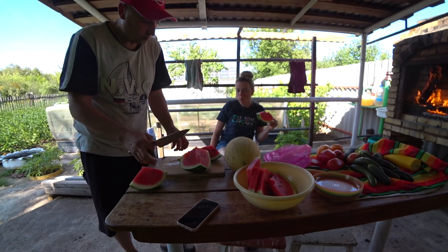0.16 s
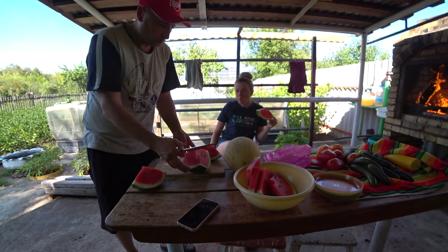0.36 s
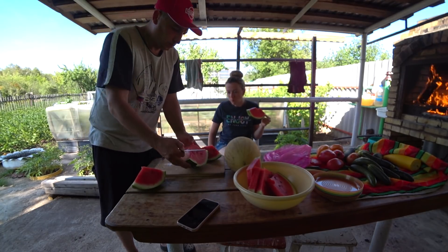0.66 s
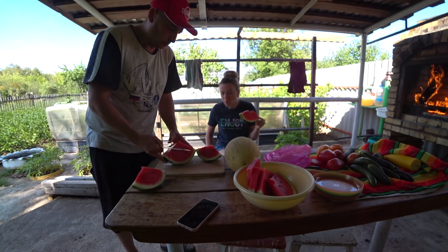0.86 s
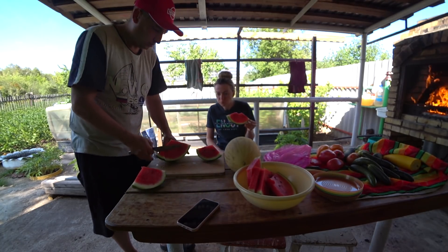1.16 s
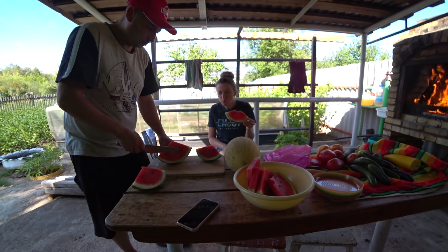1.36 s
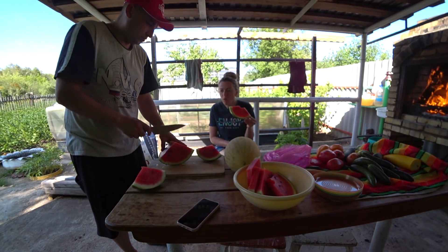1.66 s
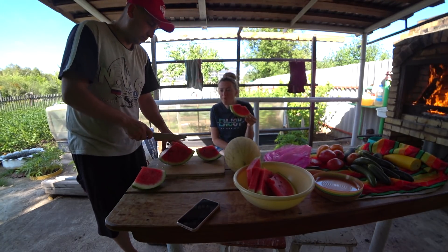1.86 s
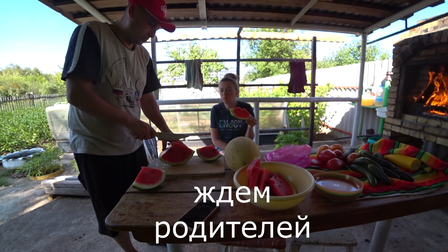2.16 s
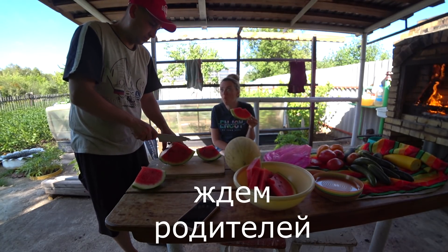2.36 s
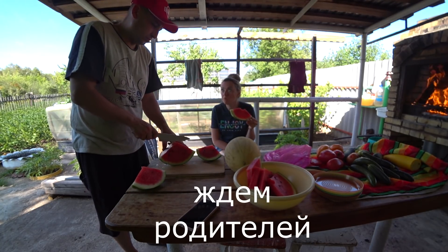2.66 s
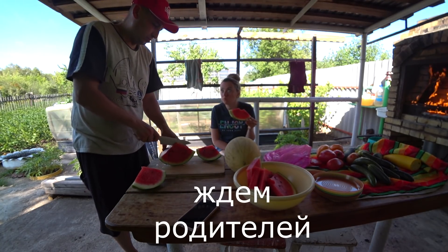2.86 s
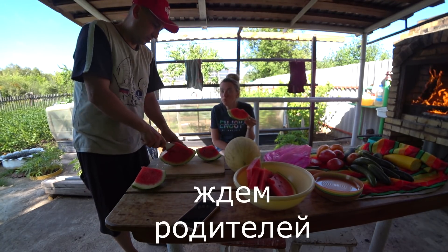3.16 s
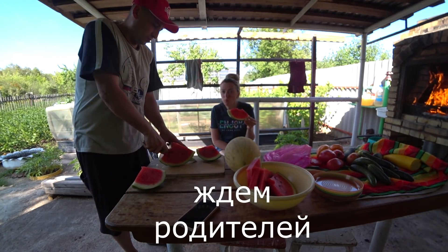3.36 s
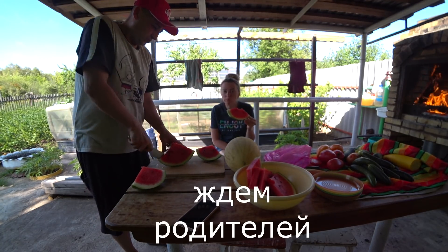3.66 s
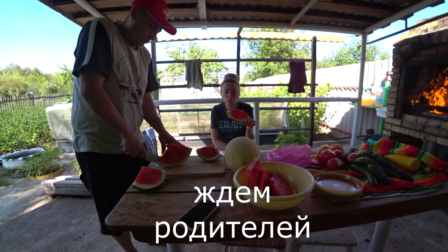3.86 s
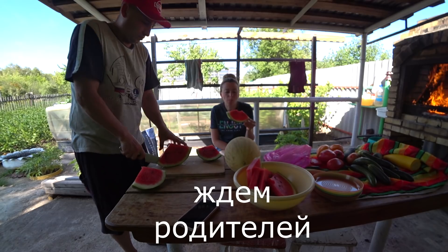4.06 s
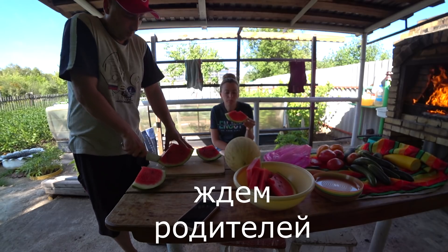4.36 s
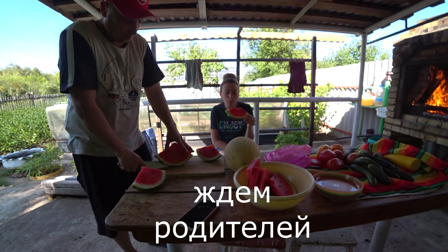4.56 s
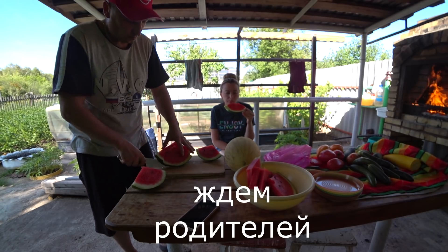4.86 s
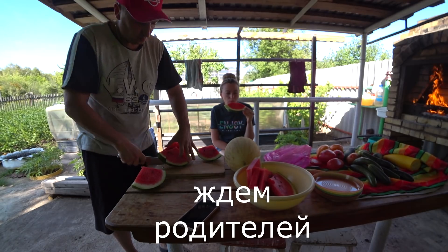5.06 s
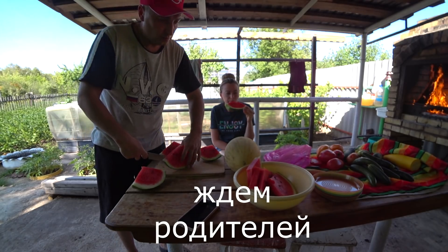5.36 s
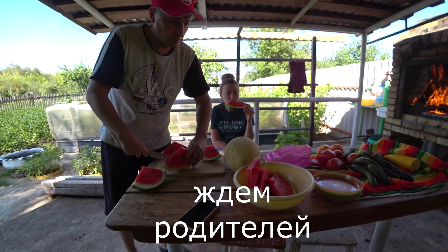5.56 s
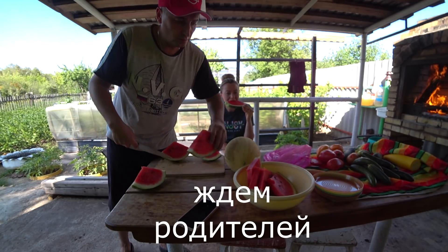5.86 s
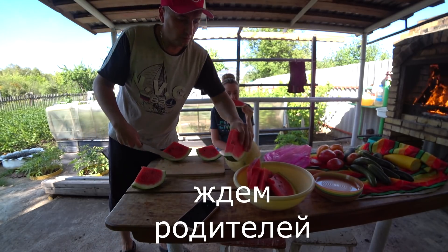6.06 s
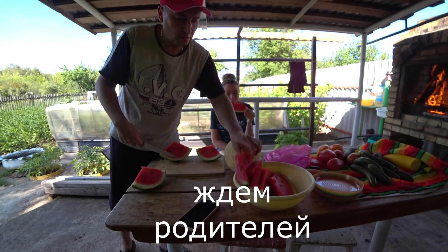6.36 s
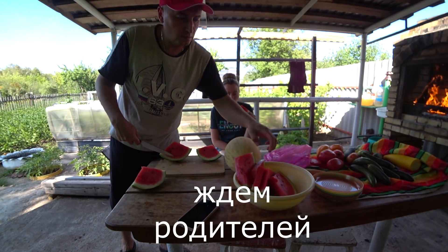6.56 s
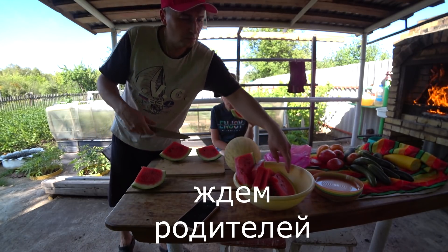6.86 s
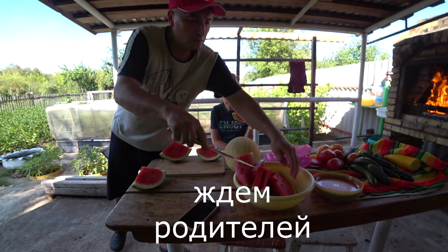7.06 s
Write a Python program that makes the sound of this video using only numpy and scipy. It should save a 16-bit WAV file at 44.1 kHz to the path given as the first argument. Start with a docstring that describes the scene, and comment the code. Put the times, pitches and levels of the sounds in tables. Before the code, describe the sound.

Close stereo pickup at a wooden table: a bright log snap from the right, quick juicy strokes, a wet smack, then a stronger cut ending in a hard board knock. A longer hissing slice leads to a crackling rind split and low bumps. Lighter sliding follows, and a piece lands faintly in a plastic bowl. Quiet garden air and tiny ember ticks continue throughout.

```python
"""A man slices watermelon on a wooden board, on a table under a porch roof, beside an open brick fireplace.
The blade hisses as tiny bursting cells, with level set by its speed; a few hard blows ring the board's modes.
The rind cracks in clicks and groans by stick and slip; pieces bump down as soft noise, and a bowl rings.
Burning logs snap on the right as echoed clicks, over quiet garden air of shaped noise and a faint hum of sines."""
import sys
import numpy as np
from scipy import signal
from scipy.io import wavfile
from scipy.ndimage import uniform_filter1d

SR = 44100
rng = np.random.default_rng(int(sys.argv[2]) if len(sys.argv) > 2 else 0)


def wrap_up_sound(samples):
    """Save the sound to the file named by the first command line argument, as 16-bit audio."""
    columns = np.atleast_2d(samples).T
    # keep every value between -1 and 1, then stretch to whole-number steps
    tamed = np.clip(columns, -1, 1)
    steps = np.round(tamed * 32767).astype(np.int16)
    wavfile.write(sys.argv[1], SR, steps)


N = 318534
EDGE_HZ = 11160  # upper edge of the audible band here
RING = np.arange(SR // 2) / SR  # time axis of one blow (s)


def amp(db):
    """Level law: an amplitude ratio is 10 to the power of dB / 20."""
    return 10 ** (np.asarray(db) / 20)


def unit(x):
    """Normalization: scales a signal to rms 1."""
    return x / np.sqrt(np.mean(x ** 2) + 1e-20)


def read(points, hz):
    """Interpolation on a log-frequency axis, where equal steps are equal musical intervals."""
    f, value = np.transpose(points)
    return np.interp(np.log(hz + 1), np.log(f), value)


def add(mix, s, sound):
    """Superposition: adds a stereo sound at time s."""
    part = mix[:, max(round(s * SR), 0):][:, :sound.shape[1]]
    part += sound[:, :part.shape[1]]


def convolve(a, b):
    """Linear filtering: convolves mono or stereo signals, keeping the length of the first."""
    return signal.fftconvolve(np.atleast_2d(a), np.atleast_2d(b), axes=1)[:, :np.shape(a)[-1]]


def click(colour, tilt_db=0, size=2048):
    """Minimum phase: a causal click of energy 1 with the given spectrum, tilted by dB per octave."""
    hz = abs(np.fft.fftfreq(size, 1 / SR))
    tilt = tilt_db * np.log2(np.clip(hz, 200, EDGE_HZ))
    above_edge = np.clip(hz / EDGE_HZ - 1, 0, 1)
    log_gain = np.log(amp(read(colour, hz) + tilt - 30 * above_edge))
    # the Hilbert transform of the log gain gives the phase
    spectrum = np.exp(np.conj(signal.hilbert(log_gain)))
    wave = np.fft.ifft(spectrum).real[:size // 2]
    return wave / np.linalg.norm(wave)


def pair(count, same):
    """Interaural correlation: left and right white noise with a given likeness."""
    mid, side = rng.standard_normal((2, count))
    same = np.clip(same, 0, 1)
    return mid * np.sqrt((1 + same) / 2) + np.array([side, -side]) * np.sqrt((1 - same) / 2)


def dying(t60):
    """Exponential decay: an envelope that falls 60 dB in t60 seconds."""
    return np.exp(-np.log(1000) * RING / t60)


def scatter(t60, same):
    """Diffuse reverberation: a dense, dying cloud of echoes with mean energy 1 in each ear."""
    envelope = dying(t60) * (1 - np.exp(-RING / 0.0019))
    return pair(len(RING), same) * envelope / np.linalg.norm(envelope)


def porch(near_db, far_db):
    """Room response: direct sound, quick echoes off the table and the longer wash under the roof."""
    direct = RING == 0
    return direct + amp(near_db) * scatter(0.038, 0.52) + amp(far_db) * scatter(0.16, 0.76)


def ring(modes, hold=1):
    """Modal decay: dying sines, each starting up or down by chance; a hand on the wood shortens them."""
    return sum(rng.choice([-1, 1]) * amp(db) * dying(t60 * hold) * np.sin(2 * np.pi * hz * RING)
               for hz, db, t60 in modes)


def resonate(x, hz, width):
    """Resonance: a one-pole filter of gain 1 at its centre, which follows the curve hz."""
    turn = np.exp(2j * np.pi * np.cumsum(hz) / SR)
    r = np.exp(-np.pi * width / SR)
    # shift the centre down to zero, smooth, and shift back
    return 2 * (turn * signal.lfilter([1 - r], [1, -r], x / turn)).real


# Lines of the hum, the deepest first. Each row: frequency in Hz, level in dB relative to its group.
HUM_LINES = [(65, -1), (130.5, -0.5), (199, -1)]
# Level of the deepest line over time. Each row: time in seconds, level in dB before its own line level.
DEEP_LEVEL = [(0.15, -74), (2.45, -76), (2.84, -84), (3.65, -81), (3.89, -96), (4.23, -78), (4.85, -91),
              (5.38, -73), (6.25, -92), (6.67, -74), (7.1, -75)]


def hum(deep_db=0, upper_db=-76, waver=0.46):
    """Phase modulation: the sines of a faint, distant hum waver in pitch (waver in radians)."""
    t = np.arange(N) / SR
    drift = signal.resample(rng.standard_normal((len(HUM_LINES), 24)), N, axis=1)
    deep, *upper = [amp(db) * np.sqrt(2) * np.sin(2 * np.pi * hz * t + waver * w)
                    for (hz, db), w in zip(HUM_LINES, drift)]
    deep_level = deep_db + np.interp(t, *np.transpose(DEEP_LEVEL))
    return amp(deep_level) * deep + amp(upper_db) * sum(upper)


# Spectrum of the air. Each row: frequency in Hz, relative level in dB.
AIR_COLOUR = [(25, -41), (50, -33), (90, -15.5), (120, -12.5), (160, -14.5), (200, -12), (260, -13),
              (500, -3.5), (800, -6.5), (1150, -7), (1600, -6), (2300, -10), (5000, -17), (11000, -25.5)]
# Broad resonances in the background. Each row: centre in Hz, width in Hz, height in dB.
AIR_RESONANCES = [(560, 63, 2.5), (1490, 150, 5.5)]
# Left-right likeness of the air. Each row: frequency in Hz, correlation from 0 to 1.
AIR_LIKENESS = [(60, 0.96), (140, 0.86), (350, 0.79), (840, 0.024), (2030, 0.059), (4890, 0.075),
                (11800, 0.3)]
AIR_DB = -54.5  # mean level of the two channels


def air(patchy_db=1.5, swell_db=-0.74):
    """Spectral shaping of noise: garden air and the soft rush of flames, drifting in patches."""
    frames, hz = N // 256 + 5, np.fft.rfftfreq(1024, 1 / SR)
    a, b, c, d, patches = rng.standard_normal((5, frames, len(hz)))
    # smooth over time, then over frequency
    patches = unit(uniform_filter1d(uniform_filter1d(patches, size=12, axis=0), size=14, axis=1))
    swell = unit(uniform_filter1d(rng.standard_normal((frames, 1)), size=50, axis=0))
    same = np.clip(read(AIR_LIKENESS, hz), -1, 1)
    left = a + 1j * b
    right = same * left + np.sqrt(1 - same ** 2) * (c + 1j * d)
    humps = sum(db * np.exp(-2 * ((hz - f) / width) ** 2) for f, width, db in AIR_RESONANCES)
    level = read(AIR_COLOUR, hz) + humps + patchy_db * patches + swell_db * swell
    spectra = np.array([left, right]) * amp(level)
    wash = signal.istft(np.swapaxes(spectra, 1, 2), nperseg=1024, noverlap=768)[1][:, :N]
    return unit(wash) * amp(AIR_DB + np.array([[-.4], [.4]]))  # right slightly louder


# Snaps of the burning logs. Each row: start in seconds, level in dB before the common gain,
# tilt in dB per octave, the splinter's own pitch in Hz.
LOG_SNAPS = [(0.104, -24.5, -1, 5500), (0.19, -41.5, 1, 2950), (0.241, -31.5, -2.5, 6650),
             (0.2892, -35.5, 1.5, 6000), (0.4743, -10.5, -1.5, 8000), (1.0846, -31, -2, 6700),
             (2.178, -45.5, 0, 1470), (2.2091, -37.5, 0, 1550), (2.3251, -43, 0, 1580),
             (2.4637, -48, 1, 1600), (3.2237, -31, -2, 1580), (4.2682, -35, 0.5, 2330),
             (4.3053, -43, 5, 8520), (5.2959, -33, 0.5, 6960), (6.073, -39.5, 1.5, 1600),
             (6.7042, -36, -1.5, 5870), (6.9297, -33.5, -2.5, 6960), (6.979, -40.5, -1, 1490)]
# Spectrum of a snap. Each row: frequency in Hz, relative level in dB.
SNAP_SPECTRUM = [(100, -33), (330, -29.5), (500, -1), (1000, -1), (1600, 5), (3000, 2), (4500, 2),
                 (7500, 5), (11000, -1.5)]
# Paths from the fireplace. Each row: delay in milliseconds, left gain, right gain (amplitude factors).
HEARTH_PATHS = [(0, 0.22, 1), (.42, 0.043, 1), (1.65, 0.26, 0.6), (2.3, -.1, -0.67), (2.85, 0.26, 0.78),
                (5.57, 0.88, 0.28)]


def fire(gain_db=10.5, near_db=3.5, far_db=4.0, splinter_db=1, splinter_width=1500,
         ember_db=-39, embers_per_s=7):
    """Early reflections: snaps ring splinters and echo in the brick hearth; tiny embers tick between."""
    out, paths = np.zeros((2, N)), np.zeros((2, len(RING)))
    for ms, left, right in HEARTH_PATHS:
        add(paths, ms / 1000, np.array([[left], [right]]))
    for s, db, tilt_db, hz in LOG_SNAPS:
        snap = click(SNAP_SPECTRUM, tilt_db)
        snap = snap + amp(splinter_db) * resonate(snap, np.full(len(snap), hz), splinter_width)
        snap = snap / np.linalg.norm(snap)
        echoes = paths + amp(near_db) * scatter(0.079, 1.0) + amp(far_db) * scatter(0.18, 0.64)
        add(out, s, amp(db + gain_db) * convolve(echoes, snap))
    embers = (rng.random(N) < embers_per_s / SR) * rng.uniform(0.12, 1, N)
    ticks = convolve(embers, click(SNAP_SPECTRUM))
    return out + amp(ember_db) * convolve(ticks, paths + scatter(0.12, 0.96))


def bowl(start=6.378, ring_hz=1005, t60=0.29, level_db=-53):
    """Single-mode decay: the plastic bowl rings faintly as a slice lands in it."""
    out = np.zeros((2, N))
    add(out, start, convolve(ring([(ring_hz, level_db, t60)]), porch(near_db=-7, far_db=-13)))
    return out


# Pieces of melon set down, pressed home or rocked. Each row: start in seconds, level in dB,
# rise in seconds, t60 in seconds, tilt in dB per octave.
MELON_BUMPS = [(.95, -51, .021, 0.34, -1.5), (1.412, -53.5, 0.015, 0.25, -7),
               (1.548, -55.5, 0.018, .4, -3.5), (3.372, -44, .004, 0.21, -4),
               (3.946, -48.5, 0.0062, 0.18, 4.5), (4.49, -42.5, 0.031, 0.23, 6),
               (4.79, -37.5, .026, 0.27, 2), (4.939, -46, .008, 0.31, 2.5), (6.372, -49.5, 0.0097, .15, -1),
               (6.784, -50, .002, .19, -1.5)]
# Spectrum of a bump. Each row: frequency in Hz, relative level in dB.
BUMP_SPECTRUM = [(60, -27), (150, -21), (240, -4.5), (340, 4), (450, 0), (800, -7), (1400, -8.5),
                 (2500, -36), (6000, -44)]


def bumps():
    """Contact time: soft, wet pieces land slowly, so they thud without a click."""
    out = np.zeros((2, N))
    for s, db, rise, t60, tilt_db in MELON_BUMPS:
        envelope = np.minimum((RING / rise) ** 2, amp(-60 * (RING - rise) / t60))
        thud = convolve(pair(len(RING), 0.99), click(BUMP_SPECTRUM, tilt_db))
        add(out, s, amp(db) * envelope * thud)
    return out


# Resonances of rind rubbing on wood. Each row: frequency in Hz, width in Hz, relative level in dB.
RIND_RESONANCES = [(457, 62, 0.5), (820, 110, 0), (1000, 150, -4), (1410, 58, -1), (2540, 200, -14)]


def groan(start=4.80, slip_hz=472, rough=.1, level_db=-38):
    """Stick-slip friction: rind catches and lets go on the wet board as the halves are pushed apart."""
    length = .028  # s
    wander = unit(uniform_filter1d(rng.standard_normal(len(RING)), size=100))
    rate = slip_hz * (1 + rough * wander)
    force = np.sqrt(np.sin(np.pi * np.minimum(RING / length, 1)))
    # one impulse for each completed cycle
    slips = np.diff(np.floor(np.cumsum(rate) / SR), prepend=0) * force
    body = sum(amp(db) * width * np.exp(-np.pi * width * RING) * np.cos(2 * np.pi * hz * RING)
               for hz, width, db in RIND_RESONANCES)
    band = signal.butter(4, [280, 2500], "band", fs=SR, output="sos")
    sound = signal.sosfilt(band, convolve(slips, body))
    sound = sound / np.std(sound[:, RING < length])
    out = np.zeros((2, N))
    add(out, start, amp(level_db) * convolve(sound, porch(near_db=-11, far_db=-9)))
    return out


# Wet clicks as the flesh lets go of the blade. Each row: start in seconds, level in dB.
WET_SMACKS = [(1.673, -12.5), (4.189, -32)]
# Spectrum of a smack. Each row: frequency in Hz, relative level in dB.
SMACK_SPECTRUM = [(100, -30), (600, -20), (1700, -17), (2200, -2), (3000, -1), (3900, -6), (4700, -18),
                  (11000, -25.5)]


def smacks(pull_t60=0.027, pull_db=0):
    """Pressure release: suction breaks with a pop and a quick, narrow-band crackle."""
    out = np.zeros((2, N))
    for s, db in WET_SMACKS:
        pull = convolve((RING == 0) + amp(pull_db) * scatter(pull_t60, 0.76), click(SMACK_SPECTRUM))
        add(out, s, amp(db) * convolve(pull, porch(near_db=-12, far_db=-4.5)))
    return out


# The blade meets the board. Each row: start in seconds, level in dB,
# hardness as a corner in Hz, ring time as a factor on the board's.
BOARD_KNOCKS = [(3.3712, -16.5, 3600, 0.91), (4.5237, -31, 2500, 1.0), (6.7842, -37.5, 8000, 0.34)]
# Modes of board and table. Each row: frequency in Hz, relative level in dB, t60 in seconds before that factor.
BOARD_MODES = [(196, -18, 0.16), (300, -20, 0.17), (404, -22, .12), (525, -5.5, 0.23), (592, -5.5, 0.29),
               (680, -10, 0.23), (812, -7, 0.14), (875, -5, 0.12), (935, -5.5, 0.16), (996, -7.5, 0.22),
               (1412, 0, 0.04), (1703, -4.5, 0.12), (2160, -15, 0.14), (2560, -8.5, 0.11),
               (2837, -16, 0.14), (3450, -14, 0.11), (4405, -0.5, 0.054)]
# Spectrum of the contact. Each row: frequency in Hz, relative level in dB.
KNOCK_SPECTRUM = [(60, -45), (200, -14.5), (370, -15), (510, -5), (900, 3.5), (1200, -5), (1700, -3.5),
                  (3000, -11.5), (5500, -14), (11000, -21.5)]


def knocks(crack_db=19, clatter_db=21, clatter_t60=0.21, modes_db=-7.0, low_hz=175):
    """Impact excitation: the blade breaks through; a hard contact, board modes and the table's clatter."""
    out = np.zeros((2, N))
    for s, db, hard_hz, hold in BOARD_KNOCKS:
        clatter = np.sqrt(hold) * scatter(clatter_t60 * hold, 0.79)
        contact = amp(crack_db) * scatter(0.027, 0.86) + amp(clatter_db) * clatter
        blow = amp(modes_db) * ring(BOARD_MODES, hold) + convolve(contact, click(KNOCK_SPECTRUM))
        softening = signal.butter(1, min(hard_hz, EDGE_HZ), fs=SR)
        add(out, s, amp(db) * signal.lfilter(*softening, blow))
    # the blows carry almost no bass
    return signal.sosfilt(signal.butter(4, low_hz, "high", fs=SR, output="sos"), out)


# Fibres of the rind giving way, and smaller wet ticks at other moments. Each row: start in seconds, # level in
# dB before the common gain, tilt in dB per octave.
RIND_CRACKS = [(1.0757, -31.5, -1), (1.735, -31.5, 5), (3.584, -30.5, -1.5), (3.8106, -41, 4),
               (3.946, -26.5, -1), (4.462, -28, -3), (4.4785, -26, 0), (4.4946, -15.5, 0.5),
               (4.501, -18.5, -1), (4.5224, -13, 0), (4.797, -37, 0), (6.0272, -27, 1), (6.3791, -35.5, 7)]
# Spectrum of a crack, also used by the split. Each row: frequency in Hz, relative level in dB.
CRACK_SPECTRUM = [(100, -35), (350, 7.5), (700, -1), (1500, 8), (2700, 8.5), (4500, 8), (7500, 9),
                  (11000, 3)]


def cracks(gain_db=3, tear_t60=0.0038, tear_db=4):
    """Brittle fracture: a bundle of fibres snaps and tears for a few milliseconds."""
    out = np.zeros((2, N))
    for s, db, tilt_db in RIND_CRACKS:
        tear = (RING == 0) + amp(tear_db) * scatter(tear_t60, 1.0)
        crack = convolve(tear, click(CRACK_SPECTRUM, tilt_db))
        add(out, s, amp(db + gain_db) * convolve(crack, porch(near_db=-1.5, far_db=-1.0)))
    return out


def split(start=4.477, length=.047, first_db=-45, last_db=-37, fibres_per_s=900, tilt_db=-1.5):
    """Crack growth: small fibres tear ever louder ahead of the blade until the piece breaks free."""
    t = np.arange(0, length, 1 / SR)
    fibres = unit((rng.random(len(t)) < fibres_per_s / SR) * rng.standard_normal(len(t)))
    growth = amp(first_db + (last_db - first_db) * t / length)
    out = np.zeros((2, N))
    add(out, start, (fibres * growth)[None])
    return convolve(convolve(out, click(CRACK_SPECTRUM, tilt_db)), porch(near_db=0.0, far_db=1))


BITE = 0.72  # under 1, the blade gathers speed early in its push


def blade_speed(rise, fall):
    """Kinematics of one push, 0-1: a quarter sine up to top speed and another back to rest."""
    t = np.arange(0, rise + fall, 1 / SR)
    return np.sin(np.pi / 2 * np.where(t < rise, (t / rise) ** BITE, 1 + (t - rise) / fall))


DRAG_DB, DRAG_S = 1, 0.01176  # uneven flesh: rms depth of the random points and the time between them


def drag(count):
    """Fluctuating resistance: random ripples in level (dB) as the blade meets firmer and softer flesh."""
    return DRAG_DB * np.interp(np.arange(count) / SR / DRAG_S, np.arange(200), rng.standard_normal(200))


def juice(colour, count, grain_db, grains_per_s):
    """Shot noise: countless cells burst as tiny clicks of unequal size, with fresh echoes at each call."""
    size = amp(grain_db * np.minimum(rng.exponential(1, SR), 4)) * rng.standard_normal(SR)
    bursts = size * (rng.random(SR) < grains_per_s / SR)
    cells = convolve(bursts, click(colour))
    return unit(convolve(cells, porch(near_db=-2.5, far_db=-7.0))[:, -count:])


# Strokes of the blade and wet sliding. Each row: start in seconds, speeding up in seconds,
# slowing down in seconds, level in dB, share of fine spray in dB, share passed into the board in dB,
# squelch in Hz; the last four hold at top speed.
BLADE_STROKES = [(0.045, 0.049, 0.031, -48, -4.5, -26, 2750), (0.295, .04, .15, -54.5, -9.5, -5.5, 2360),
                 (0.54, 0.027, 0.046, -45, -11, -8, 3330), (0.66, .024, .06, -42.5, -9, -15, 2150),
                 (0.725, 0.028, 0.052, -50.5, -7.5, -9, 2300), (1.18, 0.048, .22, -54, -8, -5, 2200),
                 (1.463, 0.079, .085, -37.5, -7.5, -32, 2860), (2.85, .14, .14, -49, -4.5, -11, 4400),
                 (3.06, 0.049, 0.093, -54, -6, -8, 2200), (3.268, .1, 0.016, -41.5, -5.5, -8.5, 2900),
                 (3.535, 0.23, 0.11, -42, -3.5, -8.5, 4180), (4.457, .05, .025, -41, -11, -10, 4300),
                 (4.56, .04, .1, -53, -7, -5, 1950), (4.865, 0.06, 0.077, -49, -10.5, -14, 2050),
                 (5.645, .085, 0.071, -49, -9, -22, 2600), (5.859, .022, .23, -43, -5, -32, 4530),
                 (6.385, .05, 0.054, -46, -8.5, -11.5, 2110)]
# Spectrum of coarse wet pulp. Each row: frequency in Hz, relative level in dB.
PULP_SPECTRUM = [(100, -46), (900, -18.5), (1250, -4.5), (1600, 5), (2300, -1.5), (3200, -0.5), (4500, -1),
                 (5800, 1.5), (7000, -18), (11000, -38)]
# Spectrum of fine spray. Each row: frequency in Hz, relative level in dB.
SPRAY_SPECTRUM = [(100, -72.5), (4500, -25), (6200, 6.5), (8000, 3.5), (11000, -4.5)]
# Spectrum of the board under a stroke. Each row: frequency in Hz, relative level in dB.
RUB_SPECTRUM = [(60, -28), (200, -21), (350, 1), (550, -2), (1000, 2.5), (1400, -4.5), (3000, -46)]
LOUDNESS_POWER = 1.46  # a stroke's amplitude grows as this power of the blade's speed
SPRAY_SLOW_DB = -1.5  # change in the share of spray with the blade at rest
BOARD_SLOW_DB = 1.5  # a slow blade presses more of its sound into the board
SQUELCH_SAG = .25  # share by which the slit's pitch is lower with the blade at rest


def strokes(pulp_db=-1, spray_db=0, rub_db=-3, squelch_db=-2, squelch_width=1400):
    """Speed-driven friction: cells burst with the blade's speed, the wet slit resonates, the board rubs low."""
    out = np.zeros((2, N))
    for start, rise, fall, db, fine_db, board_db, slit_hz in BLADE_STROKES:
        speed = blade_speed(rise, fall)
        slow = 1 - speed
        level = amp(db + drag(len(speed))) * speed ** LOUDNESS_POWER
        fine = np.clip(amp(fine_db + SPRAY_SLOW_DB * slow), 0, .95)
        board = np.minimum(amp(board_db + BOARD_SLOW_DB * slow), 1)
        pulp = juice(PULP_SPECTRUM, len(speed), grain_db=2.5, grains_per_s=6000)
        squelch = resonate(pulp, slit_hz * (1 - SQUELCH_SAG * slow), squelch_width)
        pulp = unit(pulp + amp(squelch_db) * squelch)
        spray = juice(SPRAY_SPECTRUM, len(speed), grain_db=4.0, grains_per_s=6500)
        rub = juice(RUB_SPECTRUM, len(speed), grain_db=1.0, grains_per_s=3200)
        # pulp and spray share the power
        cut = amp(pulp_db) * np.sqrt(1 - fine ** 2) * pulp + amp(spray_db) * fine * spray
        add(out, start, level * (cut + amp(rub_db) * board * rub))
    return out


def scene():
    """Superposition of the garden, the fire and the work at the table."""
    surroundings = hum() + air() + fire()
    pieces = bowl() + bumps() + groan()
    cutting = smacks() + knocks() + cracks() + split() + strokes()
    return surroundings + pieces + cutting


def record(dry):
    """Band limiting: a steep linear-phase low-pass removes what lies above the band edge."""
    lowpass = signal.firwin(401, EDGE_HZ, window=("kaiser", 7), fs=SR)
    return signal.oaconvolve(dry, lowpass[None], "same")


dry = scene()
out = record(dry)
wrap_up_sound(out)
```